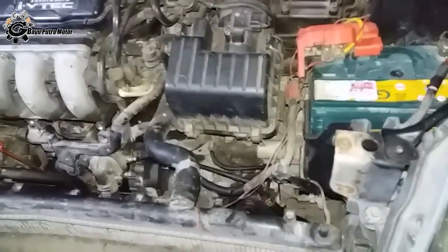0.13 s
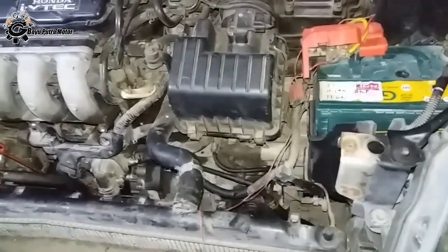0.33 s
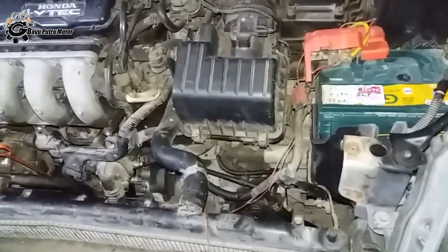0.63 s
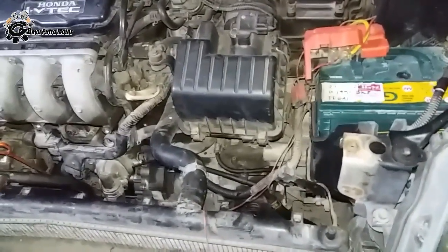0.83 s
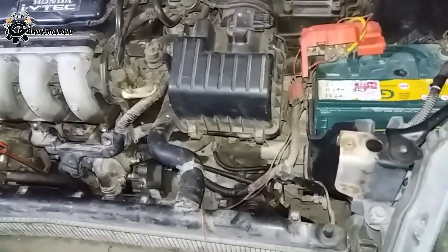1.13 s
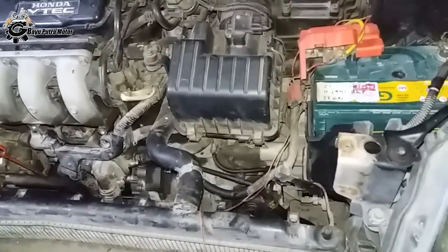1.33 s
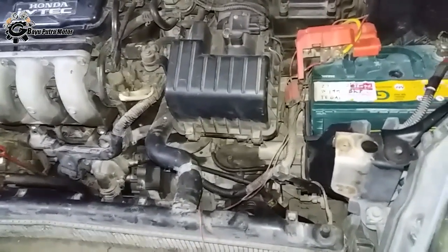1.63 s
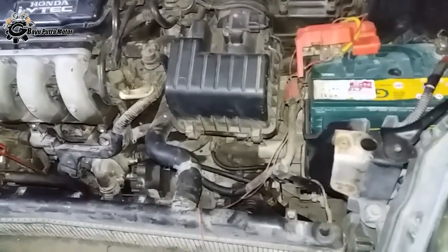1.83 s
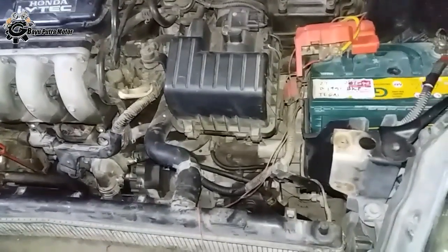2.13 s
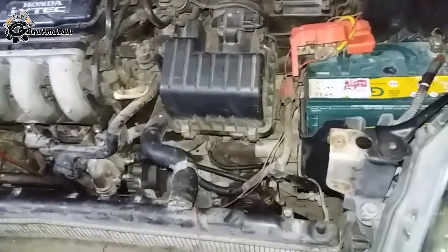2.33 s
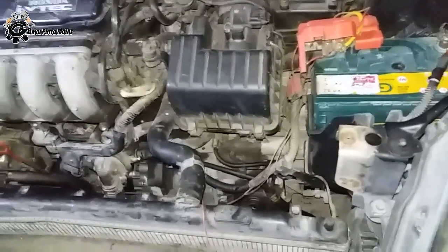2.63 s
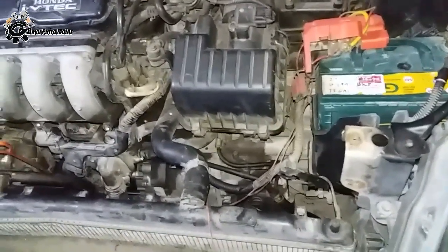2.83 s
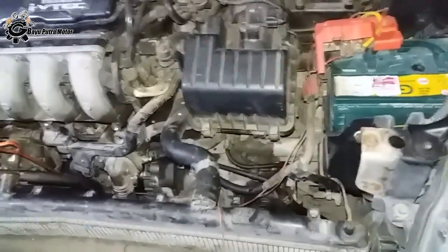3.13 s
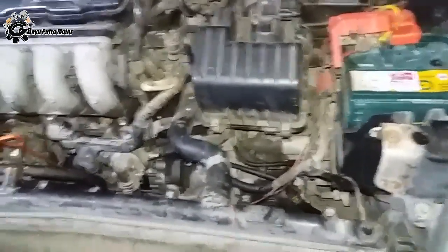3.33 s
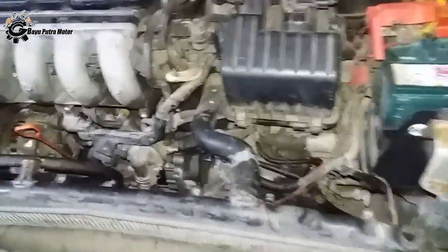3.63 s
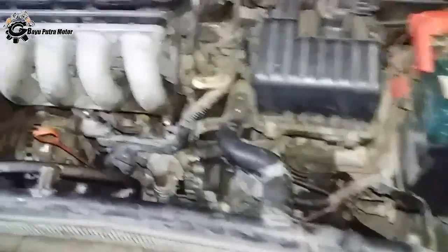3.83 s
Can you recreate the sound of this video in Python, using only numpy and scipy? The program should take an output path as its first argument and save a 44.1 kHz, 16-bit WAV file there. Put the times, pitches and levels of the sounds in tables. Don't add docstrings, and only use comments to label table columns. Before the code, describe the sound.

A car engine starts, heard close at its open bay in a yard. Until 2 s there is only faint far rumble, soft cricket chirps and a thin electric whine ending near 0.5 s. At 2.05 s the starter slams in, groaning and clattering unevenly. Around 2.8 s it releases and whines down to 3.6 s as the engine catches, hisses and ticks, then climbs to a rough, knocking roar, loudest at the 4 s cut-off.

```python
import sys
import numpy as np
from scipy import signal
from scipy.fft import rfft, irfft
from scipy.io import wavfile
from scipy.ndimage import uniform_filter1d

SR = 44100
rng = np.random.default_rng(int(sys.argv[2]) if len(sys.argv) > 2 else 0)


def nominal_scale(level):
    x = np.asarray(level, float) / 20
    return 10 ** x


def dump_mix(stems):
    frames = np.atleast_2d(stems).T
    limited = np.clip(frames, -1, 1)
    pcm = np.round(limited * 32767).astype(np.int16)
    wavfile.write(sys.argv[1], SR, pcm)


N = 176400
T = np.arange(N) / SR
# frequency [Hz], level [dB per Hz].
BLOCK_SPECTRUM = [(60, -13), (165, -12), (560, -8), (1150, -4.5), (2000, -1), (2650, -8), (3000, -14.5),
                  (4400, -25)]
# frequency [Hz], width [Hz], lift [dB].
BLOCK_MODES = [(1142, 75, 6.5), (1398, 53, 3.5), (1930, 140, -0.5), (2280, 77, 3)]


def evened(x):
    return x / np.sqrt(np.mean(x ** 2) + 1e-20)


def curve(rows, col=1):
    return np.interp(T, [r[0] for r in rows], [r[col] for r in rows])


def bump(s, half):
    return np.exp(-((T - s) / half) ** 2)


def body(x, shape, rings=()):
    hz = np.fft.rfftfreq(N, 1 / SR) + 1
    f, db = np.transpose(shape)
    level = np.interp(np.log(hz), np.log(f), db)
    level -= 30 * np.maximum(np.log2(f[0] / hz), 0)
    level -= 30 * np.maximum(np.log2(hz / f[-1]), 0)
    for centre, width, lift in rings:
        level += lift / (1 + (2 * (hz - centre) / width) ** 2)
    return evened(irfft(rfft(x) * nominal_scale(level), N))


def wander(rate_hz):
    n = max(int(SR / rate_hz), 1)
    return evened(uniform_filter1d(uniform_filter1d(rng.standard_normal(N), n), n))


def grit(spread_db, per_s):
    sizes = nominal_scale(spread_db * np.minimum(rng.exponential(1, N), 3))
    hits = sizes * (rng.random(N) < per_s / SR)
    return .6 * evened(hits * rng.standard_normal(N)) + rng.standard_normal(N)


def whistle(hz, width_hz):
    drift = wander(width_hz) + 1j * wander(width_hz)
    return evened((np.exp(2j * np.pi * hz * T) * drift).real)


def glide(s, half, hz, hz_per_s, db):
    phase = 2 * np.pi * (hz + hz_per_s * (T - s) / 2) * (T - s)
    return nominal_scale(db) * bump(s, half) * np.sin(phase)


def yard_rumble():
    # frequency in Hz, level in dB per Hz.
    rumble_spectrum = [(25, -7), (90, 2.5), (300, -6), (620, -15), (2500, -33.5), (3100, -38.5),
                       (4400, -42.5), (16000, -48.5)]
    # centre in seconds, half length in seconds, frequency in Hz, level in dB.
    passing_hums = [(1.5, .35, 468, -66), (1.62, .2, 960, -76), (.78, .04, 200, -66), (.66, .22, 3760, -85),
                    (1.72, .2, 3740, -82), (1.2, .8, 3560, -87.5), (.45, .06, 3720, -89),
                    (.6, .5, 4850, -95)]
    out = nominal_scale(-56.5 + .3 * wander(6)) * body(rng.standard_normal(N), rumble_spectrum)
    for s, half, hz, db in passing_hums:
        out += nominal_scale(db) * bump(s, half) * whistle(hz, .08 * hz)
    return out + nominal_scale(-99) * whistle(5760, 120) + nominal_scale(-98) * whistle(7300, 500)


def electric_whine():
    # frequency in Hz, level in dB rms.
    tones = [(1001, -79), (5001, -97), (6002, -91)]
    end_s = .47
    on = np.clip((end_s - T) / .01, 0, 1)
    steady = sum(nominal_scale(db + 3) * np.sin(2 * np.pi * hz * T) for hz, db in tones)
    return on * (steady + nominal_scale(-91 + 3 * wander(30)) * whistle(5080, 300))


def crickets():
    # last pulse in seconds, level in dB, top frequency in Hz.
    chirps = [(.03, -72, 5070), (.18, -77, 5130), (.398, -75, 5100), (.6, -74, 5160), (.788, -76, 5050),
              (.974, -78, 5070), (1.194, -74, 5200), (1.378, -76.5, 5200), (1.566, -77, 5080),
              (1.786, -72, 5240), (1.97, -79, 5200)]
    gap_s, pulse_s, fall_hz_per_s = .0325, .004, -25000
    out = np.zeros(N)
    for s, db, hz in chirps:
        for k in range(3):
            pulse_db = db + k * (-3.5 + 1.4 * rng.standard_normal())
            out += glide(s - k * gap_s, pulse_s, hz - 40 * k, fall_hz_per_s, pulse_db)
    return out


def armature_whine():
    # centre in seconds, half length in seconds, frequency in Hz, glide in Hz per s, level in dB.
    whines = [(2.6, .05, 3850, 2200, -51), (2.58, .03, 5720, 3300, -55), (2.93, .05, 3850, -2600, -53),
              (2.94, .03, 5750, -3900, -58), (3.12, .025, 6450, -6000, -54), (3.1, .04, 4950, -3000, -55),
              (3.25, .045, 5500, -4500, -55), (3.41, .035, 5580, -5000, -56), (3.49, .03, 4900, -5500, -52),
              (3.3, .05, 6600, -3500, -57), (3.24, .025, 2790, -1500, -51), (3.3, .03, 2600, -2500, -51),
              (3.01, .02, 4850, -1500, -56), (3.335, .025, 5000, -2500, -54),
              (3.26, .025, 4120, -3000, -57), (3.36, .03, 6230, -1000, -56), (3.52, .02, 6500, -5000, -55),
              (3.57, .02, 5950, -5000, -56), (3.58, .02, 4180, -2000, -57), (3.19, .02, 4950, -3000, -56)]
    lift_db = 6
    return nominal_scale(lift_db) * sum(glide(*row) for row in whines)


def housing_moans():
    # centre in seconds, half length in seconds, frequency in Hz, glide in Hz per s, level in dB.
    moans = [(2.143, 0.025, 900, 300, -35), (2.145, 0.023, 298, -400, -44), (2.165, .012, 1060, -1500, -34),
             (2.205, 0.013, 1000, 0, -37), (2.272, .018, 1110, 3500, -31), (2.318, 0.011, 415, -9000, -37),
             (2.335, 0.013, 1960, -2000, -30), (2.8, .018, 1200, -1500, -34), (2.45, .02, 860, -2500, -40),
             (2.19, .03, 238, 0, -47.5), (2.1, 0.032, 190, 0, -49.5), (2.262, 0.009, 1520, 0, -35),
             (2.1, 0.0087, 1520, -2000, -33), (2.31, 0.014, 860, 0, -36), (2.68, .012, 1420, 0, -32)]
    return sum(glide(*row) for row in moans)


def mesh_turns():
    # time in seconds, teeth per second in Hz.
    mesh_speed = [(2.07, 293), (2.115, 282), (2.135, 294), (2.18, 301), (2.215, 285), (2.235, 296),
                  (2.255, 274), (2.292, 272), (2.322, 256), (2.336, 299), (2.4, 299), (2.424, 268),
                  (2.445, 256), (2.5, 258)]
    jitter = .016
    return np.cumsum(curve(mesh_speed) * (1 + jitter * wander(98.0))) / SR


def gear_groan(turns):
    # centre in seconds, half length in seconds, level in dB, fundamental level in dB.
    groans = [(2.072, .012, -34, -12), (2.145, .022, -33, -6), (2.228, .012, -34, -20),
              (2.283, .023, -31, -25), (2.336, .013, -33, 0), (2.365, .025, -40, -20),
              (2.408, .019, -32, -25), (2.46, .03, -42, -15)]
    # multiple of the tooth rate, level in dB.
    overtones = [(2, 0), (3, -8), (4, -11)]
    upper = np.zeros(N)
    for k, db in overtones:
        upper += nominal_scale(db + 2 * wander(49)) * np.sin(2 * np.pi * k * turns + 6 * rng.random())
    low = np.sin(2 * np.pi * turns)
    return sum(nominal_scale(db) * bump(s, half) * (upper + nominal_scale(low_db) * low) for s, half, db, low_db in groans)


def starter_shell(turns, load):
    # frequency in Hz, level in dB per Hz.
    housing_spectrum = [(150, -20), (400, -13), (600, -4.5), (800, -7), (1530, -5), (1900, -6), (2200, -10),
                        (2600, -20), (3400, -27)]
    # frequency in Hz, width in Hz, lift in dB.
    housing_modes = [(896, 47, 5), (1142, 160, 5.5), (1516, 220, 6.5), (1976, 210, 7)]
    strain, free_cut_hz, free_share = .45, 850, .35
    beats = sum(nominal_scale(4 * wander(50)) * np.cos(2 * np.pi * k * turns) for k in range(3, 12))
    teeth = grit(3., 2000) + strain * .17 * beats * load
    shell = body(teeth, housing_spectrum, housing_modes)
    low = signal.sosfiltfilt(signal.butter(2, free_cut_hz, fs=SR, output="sos"), shell)
    return shell - free_share * (1 - load) * low


def loose_rattle(load):
    # frequency in Hz, level in dB per Hz.
    rattle_spectrum = [(1650, 0.5), (2800, -2), (3240, -9.5), (5170, -2.5), (6820, -10.5), (8800, -18.5),
                       (13200, -25.5), (14600, -20), (16000, -39)]
    # frequency in Hz, width in Hz, lift in dB.
    rattle_modes = [(2815, 95, 8), (3450, 160, 5.5), (3800, 38, 9), (4760, 400, 5.5), (5110, 250, 4.5),
                    (5780, 100, 5), (6700, 190, 7)]
    dull_hz, dull_share = 7500, .35
    loose = body(grit(3.3, 3000), rattle_spectrum, rattle_modes)
    top = signal.sosfiltfilt(signal.butter(2, dull_hz, "high", fs=SR, output="sos"), loose)
    return loose - dull_share * load * top


def starter():
    # centre in seconds, half length in seconds, housing level in dB, rattle level in dB.
    clatter = [(2.056, 0.0043, -35, -38.5), (2.069, 0.013, -33.5, -44), (2.144, 0.035, -38, -50.5),
               (2.21, 0.031, -34, -55), (2.256, 0.029, -36, -44), (2.295, 0.016, -37, -42.5),
               (2.331, 0.016, -33, -60), (2.397, 0.027, -38.5, -41), (2.447, 0.009, -31, -64),
               (2.485, 0.0069, -35, -42), (2.472, 0.0036, -42, -43), (2.518, 0.0073, -30.5, -42.5),
               (2.598, 0.012, -40, -44), (2.633, 0.0095, -42.5, -46), (2.682, 0.012, -31, -39),
               (2.7, .004, -31, -38), (2.734, 0.0086, -32, -35.5), (2.78, 0.024, -42, -45),
               (2.824, .008, -37, -43)]
    # time in seconds, level of the steady rattle in dB.
    grind_rattle = [(2.05, -49), (2.22, -57), (2.25, -43.5), (2.85, -41)]
    engage_s, release_s, strain_end_s = 2.048, 2.842, 2.46
    grind_db, rundown_db, rundown_s = -37.5, -47, .12
    on = np.clip((T - engage_s) / .011, 0, 1) ** 2
    on *= np.exp(-np.maximum(T - release_s, 0) / .0033)
    load = np.clip((strain_end_s - T) / .03, 0, 1)
    turns = mesh_turns()
    shell, loose = starter_shell(turns, load), loose_rattle(load)
    housing_level = nominal_scale(grind_db) + sum(nominal_scale(db) * bump(s, half) for s, half, db, _ in clatter)
    rattle_level = nominal_scale(curve(grind_rattle)) + sum(nominal_scale(db) * bump(s, half) for s, half, _, db in clatter)
    engaged = on * (gear_groan(turns) + housing_level * shell + rattle_level * loose)
    clack = nominal_scale(-54.0) * bump(engage_s - .004, .005) * shell
    fall = (T > release_s) * np.exp(-abs(T - release_s) / rundown_s)
    rundown = nominal_scale(rundown_db) * (1 - on) * fall * loose
    return clack + armature_whine() + rundown + housing_moans() + engaged


def panels(turns):
    # centre in seconds, half length in seconds, frequency in Hz, level in dB.
    resonances = [(3.275, .045, 302, -39), (3.04, .04, 88, -54), (3.26, .06, 208, -54),
                  (2.8, .012, 560, -44), (3.6, .08, 122, -52), (3.58, .05, 300, -52), (2.82, .03, 110, -51),
                  (2.068, .01, 860, -37), (2.2, .03, 420, -41)]
    alternator_order, alternator_db = 89, -51
    out = np.zeros(N)
    for s, half, hz, db in resonances:
        phase = 2 * np.pi * np.cumsum(hz * (1 + .006 * wander(30))) / SR
        out += nominal_scale(db) * bump(s, half) * np.sin(phase)
    alternator = np.sin(2 * np.pi * alternator_order * turns)
    return out + nominal_scale(alternator_db + 2 * wander(30)) * bump(3.8, .17) * alternator


def bracket(turns, firing_hz):
    order, centre_hz, width_hz, level_db = 12, 690, 45, -41.5
    tone = nominal_scale(level_db + 2.2 * wander(26)) * np.sin(2 * np.pi * order * turns)
    return tone / (1 + (2 * (order * firing_hz - centre_hz) / width_hz) ** 2)


def exhaust_hum(turns, over_db):
    # multiple of the firing rate, level in dB at full effort, share of effort followed.
    orders = [(1, -48, 1.3), (2, -55, .5), (4, -51.5, 1.3), (5, -58, 1.5), (8, -55, 1.8), (10, -58, 1.5)]
    lock_s, lock_rise_s = 3.3, .12
    locked = 1 / (1 + np.exp(np.clip((lock_s - T) / lock_rise_s * 2, -20, 20)))
    out = np.zeros(N)
    for k, db, share in orders:
        level = nominal_scale(db + 3.5 + share * over_db + 1.8 * wander(22)) * (k > 1 or locked)
        out += level * np.sin(2 * np.pi * (k * turns + rng.random()))
    return out


def firing_gate(turns, over_db):
    cylinder_db = [1, -2, 0, -2]
    fall, depth, loud_firing_s = .4, 1., 3.795
    since = turns - turns[round(loud_firing_s * SR)] + 400
    firing = since % 4
    uneven_db = 1.5 * rng.standard_normal(999)[since.astype(int)]
    size = nominal_scale(np.array(cylinder_db)[firing.astype(int)] + uneven_db)
    push = np.clip(1 + over_db / 5, 0, 1)
    return 1 + depth * push * uniform_filter1d(size * np.exp(-(firing % 1) / fall), size=150)


def valve_train(gate, over_db):
    # frequency in Hz, level in dB per Hz.
    valve_spectrum = [(1650, -3.5), (2800, -16), (3590, -9.5), (4870, -0.5), (6480, -5), (7890, -14.5),
                      (10500, -20.5), (14400, -23.5), (16000, -25)]
    # frequency in Hz, width in Hz, lift in dB.
    valve_modes = [(4240, 250, 5), (5060, 350, 2), (6420, 280, 5.5), (11400, 500, 0)]
    level_db, effort_share = -44.5, .064
    hiss = body(gate ** .37 * grit(.99, 4000), valve_spectrum, valve_modes)
    return nominal_scale(level_db + effort_share * over_db) * hiss


def knocks():
    # time in seconds, peak level in dB.
    hard_firings = [(2.936, -31), (2.9584, -31), (3.0074, -32), (3.0505, -31), (3.1364, -31), (3.229, -24),
                    (3.5164, -24), (3.6014, -22), (3.6204, -24), (3.6514, -22), (3.6644, -19.5),
                    (3.7317, -19.5), (3.765, -25), (3.7943, -21), (3.8571, -17.5), (3.92, -21),
                    (3.936, -20), (3.989, -21)]
    trim_db, rise_s, ring_s = -9, .0012, .0069
    env = np.zeros(N)
    for s, db in hard_firings:
        late = np.maximum(T - s, 0)
        env += nominal_scale(db + trim_db) * (1 - np.exp(-late / rise_s)) * np.exp(-late / ring_s)
    return env * body(grit(2., 2500), BLOCK_SPECTRUM[3:], BLOCK_MODES)


def engine():
    # time in seconds, firings per second in Hz, effort in dB.
    speed = [(2.9, 39.87, -39.5), (3.006, 42.99, -39), (3.156, 48.57, -37.5), (3.316, 53.93, -36),
             (3.484, 57.7, -34.5), (3.652, 60.85, -34), (3.934, 65.67, -31.5), (4.0, 66.3, -31.5)]
    catch_s, full_db = 2.72, -33
    on = np.clip((T - catch_s) / .068, 0, 1)
    firing_hz, effort = curve(speed), curve(speed, col=2)
    turns = np.cumsum(firing_hz) / SR
    over_db = effort - full_db
    gate = firing_gate(turns, over_db)
    roar = nominal_scale(effort - 1.5) * body(gate * grit(1.1, 2500), BLOCK_SPECTRUM, BLOCK_MODES)
    running = bracket(turns, firing_hz) + roar + valve_train(gate, over_db) + exhaust_hum(turns, over_db)
    return on * running + panels(turns)


def scene():
    yard = yard_rumble() + electric_whine() + crickets()
    car = starter() + engine() + knocks()
    tail = rng.standard_normal(6000) * nominal_scale(-60 * np.arange(6000) / SR / .24)
    echo = signal.fftconvolve(car, tail / np.linalg.norm(tail))[:N]
    return (yard + car + nominal_scale(-10.5) * echo)[None]


def top_cut(x):
    return signal.sosfilt(signal.butter(12, 16220, fs=SR, output="sos"), x)


def record(dry):
    bass_cut_hz, top_hz = 64, 15520
    low = signal.sosfilt(signal.butter(3, bass_cut_hz, "high", fs=SR, output="sos"), dry)
    lowpass = signal.firwin(801, top_hz, window=("kaiser", 9), fs=SR)
    return top_cut(signal.oaconvolve(low, lowpass[None], "same"))


dry = scene()
out = record(dry)
dump_mix(out)
```